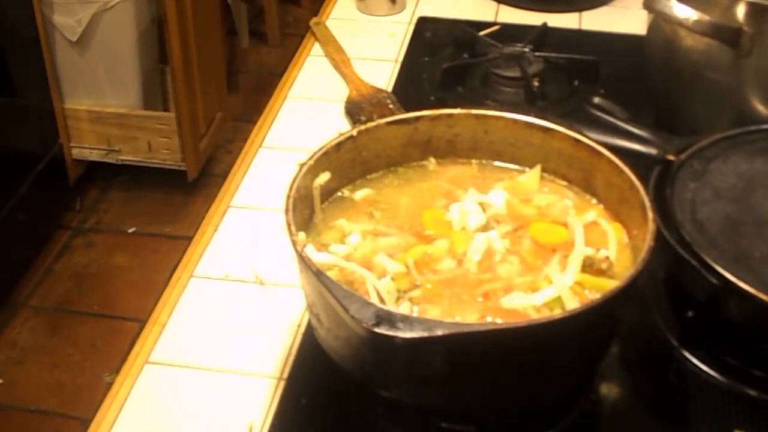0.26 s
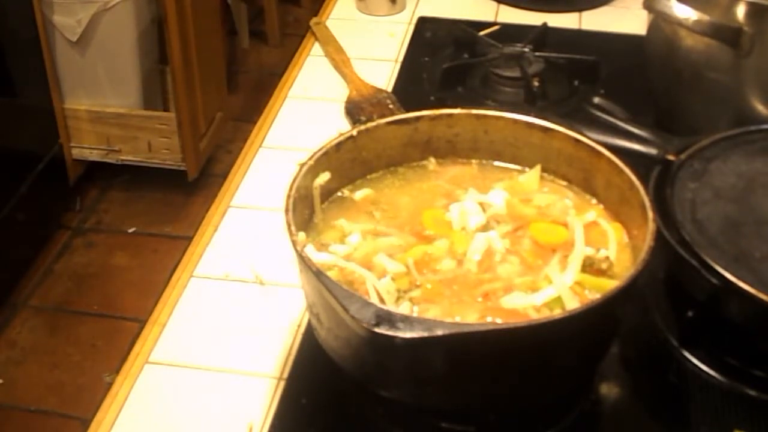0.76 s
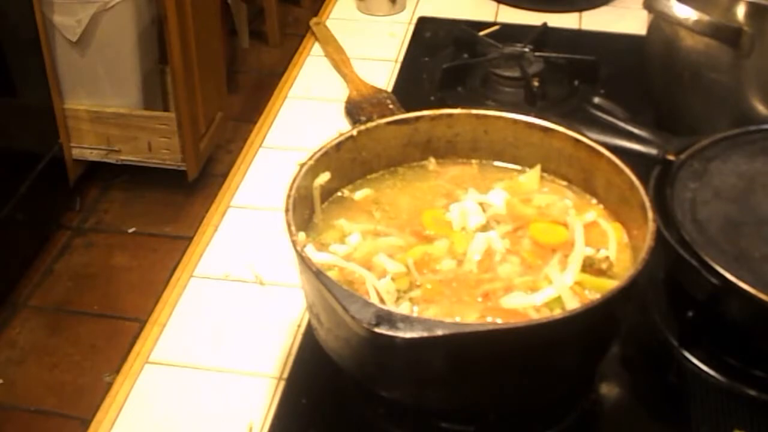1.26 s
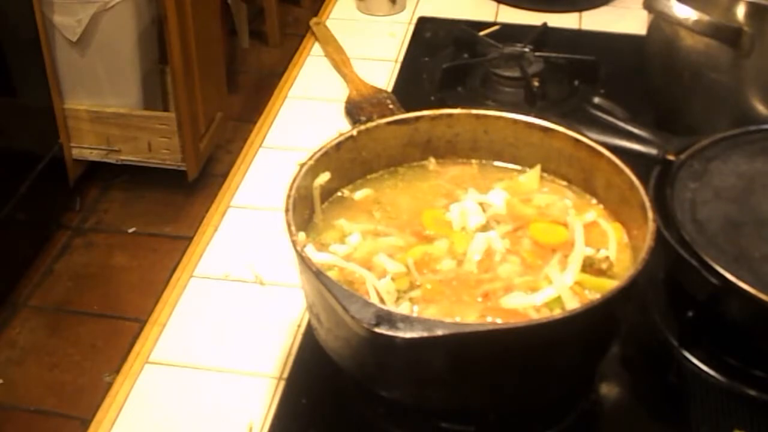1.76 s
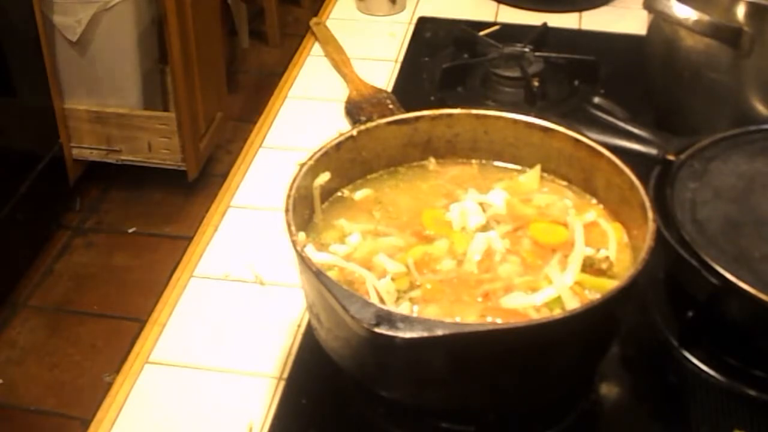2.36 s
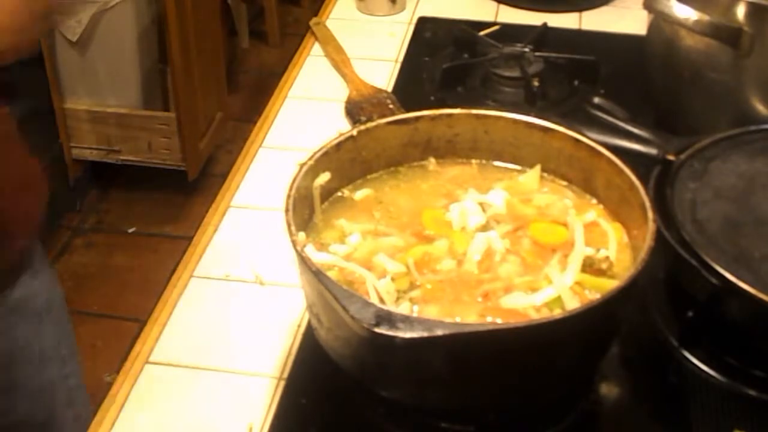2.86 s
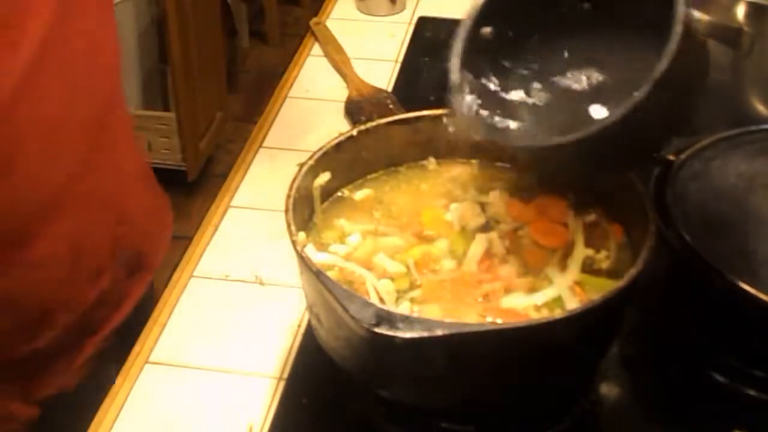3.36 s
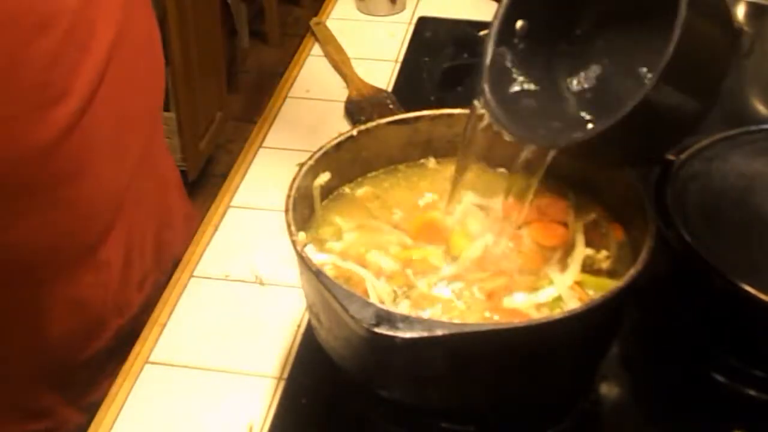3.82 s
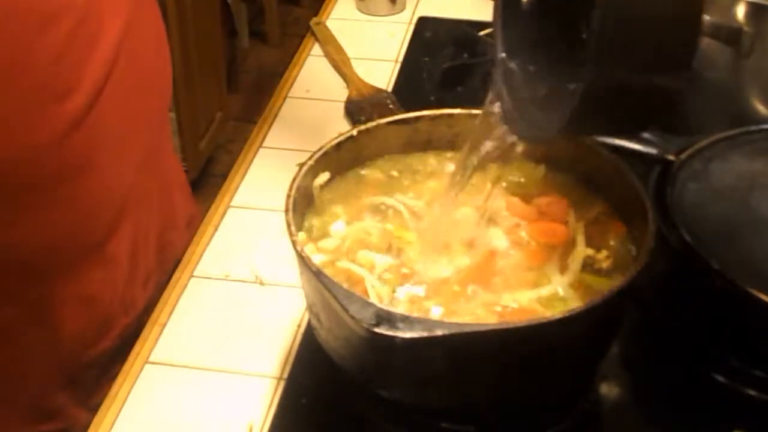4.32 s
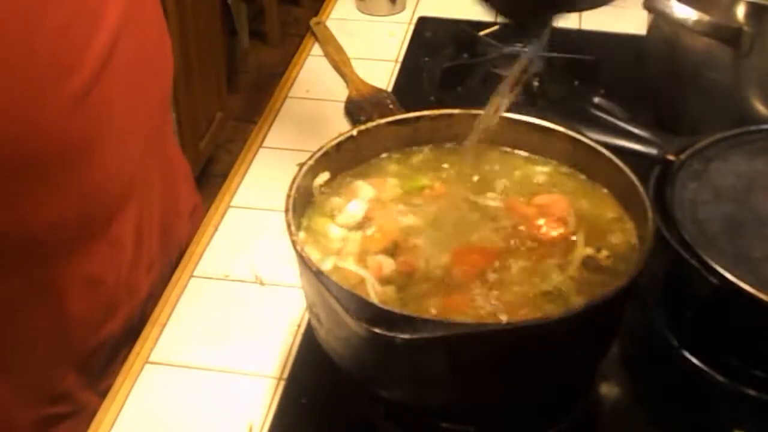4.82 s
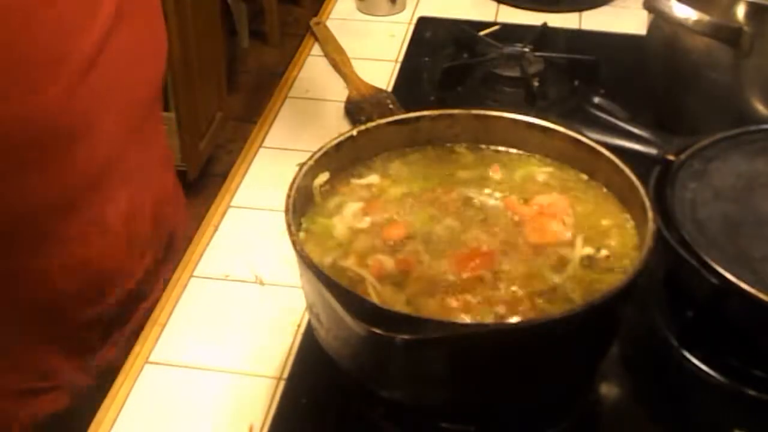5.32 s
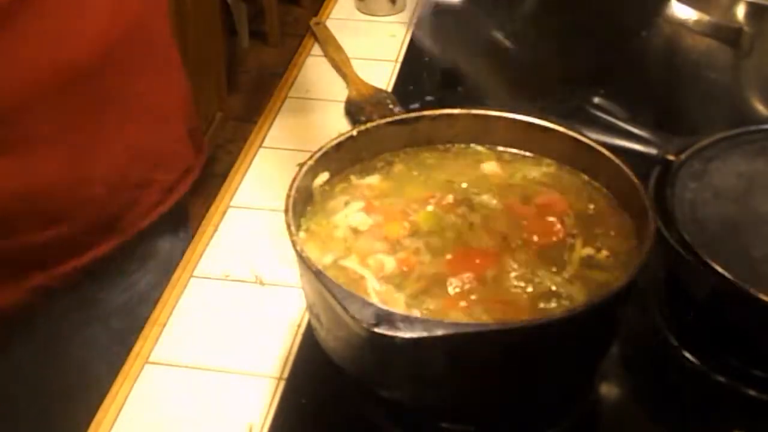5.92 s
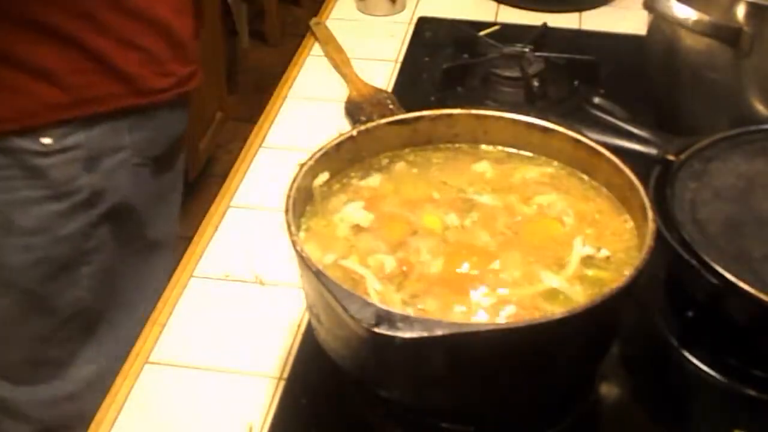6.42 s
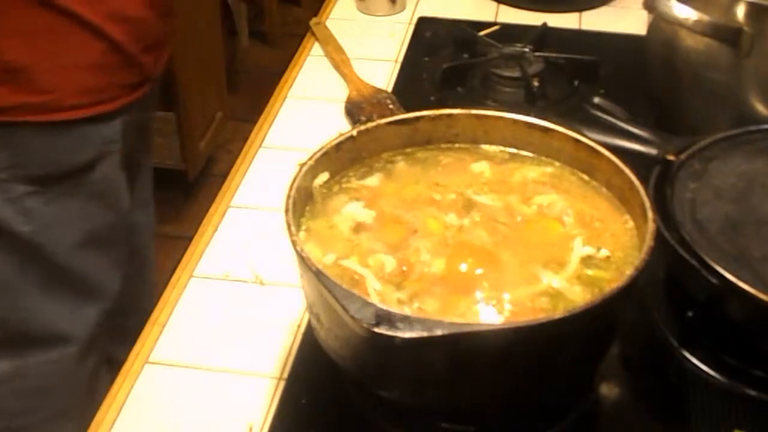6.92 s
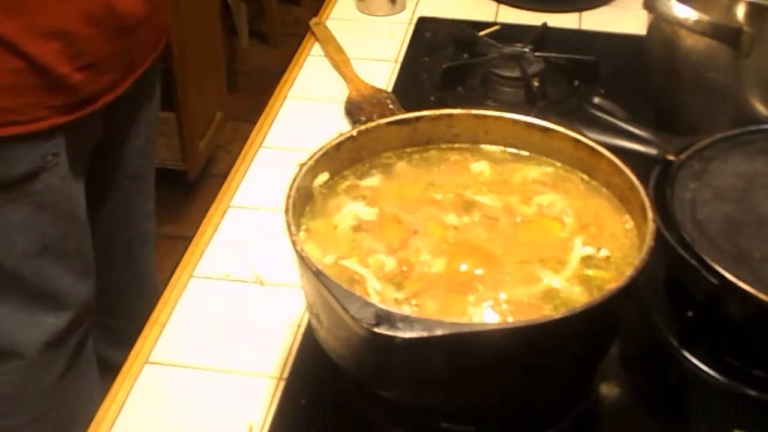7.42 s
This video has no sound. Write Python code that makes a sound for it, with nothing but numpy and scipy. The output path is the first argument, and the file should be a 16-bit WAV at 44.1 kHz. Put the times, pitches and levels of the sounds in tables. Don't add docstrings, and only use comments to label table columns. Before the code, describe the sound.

A kitchen tap hisses into a pan and shuts off, steps shuffle near, water splashes into a soup pot, then metal clanks in a sink.

```python
import sys
import numpy as np
from scipy import signal
from scipy.io import wavfile
from scipy.ndimage import uniform_filter1d

SR = 44100
rng = np.random.default_rng(int(sys.argv[2]) if len(sys.argv) > 2 else 0)


def decibels_to_gain(level_db):
    exponent = np.asarray(level_db, float) / 20
    return 10 ** exponent


def wrap_up_sound(samples):
    columns = np.atleast_2d(samples).T
    tamed = np.clip(columns, -1, 1)
    steps = np.round(tamed * 32767).astype(np.int16)
    wavfile.write(sys.argv[1], SR, steps)


N = 338688
T = np.arange(N) / SR
# f/Hz, likeness/0-1
LIKENESS = [(60, 1), (180, 1), (550, 0.96), (1650, 0.75), (3500, 0), (15000, 0)]


def evened(x):
    return x / np.sqrt(np.mean(x ** 2) + 1e-20)


def read(points, hz):
    f, value = np.transpose(points)
    return np.interp(np.log(hz + 1), np.log(f + 1), value)


def bumps(peaks, hz):
    return sum(db / (1 + (2 * (hz - f) / width) ** 2) for f, width, db in peaks)


def lean_left(db):
    return decibels_to_gain(np.array([[db], [-db]]))


def add(mix, s, sound):
    part = mix[round(s * SR):][:len(sound)]
    part += sound[:len(part)]


def swell(s, db, rise_s, fall_s):
    rising = (s - T) / max(rise_s, 1e-3)
    falling = (T - s) / max(fall_s, 1e-3)
    return decibels_to_gain(db - 20 * np.maximum(rising, falling))


def swells(rows):
    return sum(swell(*row) for row in rows)


def noise(colour, peaks=(), lag=0, patchy_db=1.5, flicker_db=2.0, size=1024, alike=1):
    frames, hz = 4 * N // size + 5, np.fft.rfftfreq(size, 1 / SR)
    a, b, c, d, patches = rng.standard_normal((frames, len(hz), 5)).T
    patches = uniform_filter1d(patches, size=size // 80, axis=0)
    patches = evened(uniform_filter1d(patches, size=8, axis=1))
    same = np.clip(alike * read(LIKENESS, hz), 0, 1)[:, None]
    right = a + 1j * b
    delay = np.exp(-2j * np.pi * hz * lag / SR)[:, None]
    left = same * right * delay + np.sqrt(1 - same ** 2) * (c + 1j * d)
    spectrum_db = (read(colour, hz) + bumps(peaks, hz))[:, None]
    flicker = flicker_db * rng.standard_normal(frames)
    z = np.array([left, right]) * decibels_to_gain(spectrum_db + patchy_db * patches + flicker)
    return evened(signal.istft(z, nperseg=size, noverlap=3 * size // 4)[1][:, :N])


def bubble(hz, t60, rise=0.22, onset_cycles=0.81):
    t = np.arange(int(t60 * SR) + 50) / SR
    ring = np.sin(2 * np.pi * hz * t * (1 + rise * t / t60))
    return ring * decibels_to_gain(-60 * t / t60) * np.minimum(t * hz / onset_cycles, 1)


def swarm(lo_hz, hi_hz, cycles, per_s, spread_db):
    out = np.zeros(N)
    for hz in np.geomspace(lo_hz, hi_hz, num=36):
        level = decibels_to_gain(spread_db * np.minimum(rng.exponential(1, N), 4))
        births = level * (rng.random(N) < per_s / 36 / SR)
        out += signal.oaconvolve(births, np.sqrt(hz) * bubble(hz, cycles / hz))[:N]
    return evened(out)


def strike(blows, modes, split=0.0099, dulling=0.084, spot_db=5.0):
    out, t = np.zeros(N), np.arange(SR // 2) / SR
    shape = (len(modes), 5, 1)
    detune = 1 + split * rng.standard_normal(shape) * (np.arange(5) > 0)[:, None]
    for s, db in blows:
        spots = spot_db * rng.standard_normal(shape)
        slope_db = dulling * min(db - blows[0][1], 0)
        ring = 0
        for (hz, level_db, t60), spot, ratio in zip(modes, spots, detune):
            decay = decibels_to_gain(level_db + slope_db * np.log2(1 + hz / 1000) - 60 * t / t60)
            ring = ring + decay * (decibels_to_gain(spot) * np.sin(2 * np.pi * hz * ratio * t)).sum(0)
        add(out, s, decibels_to_gain(db) * ring * np.minimum(t / 0.0022, 1) / abs(ring).max())
    return out


def kitchen(x, lag, pan_db, wet_db):
    # f/Hz, t60/s
    decay_times = [(200, 0.3), (1000, 0.18), (4000, 0.23), (12000, 0.24)]
    taps = np.zeros((2, SR // 2))
    at = np.arange(100, SR // 2 - 20, 20) + rng.integers(0, 20, (2, (SR // 2 - 101) // 20))
    np.put_along_axis(taps, at, rng.choice([-1., 1.], at.shape), 1)
    hz, t, z = signal.stft(taps, SR, nperseg=256)
    same = np.clip(read(LIKENESS, hz), 0, 1)[:, None]
    z[0] = same * z[1] + np.sqrt(1 - same ** 2) * z[0]
    z = z * decibels_to_gain(-60 * t / read(decay_times, hz)[:, None])
    tail = signal.istft(z, SR, nperseg=256)[1]
    wet = signal.fftconvolve(x[None], tail / np.linalg.norm(tail[0]), axes=1)[:, :N]
    direct = np.array([np.roll(x, round(lag)), x])
    return (direct + decibels_to_gain(wet_db) * wet) * lean_left(pan_db / 2)


def stream():
    # t/s of the peak, spray level/dB, plunge level/dB, rise/s, fall/s
    gushes = [(3.571, -37, -4, 0.016, 0.0082), (3.61, -48, 2.5, 0.02, 0.19), (3.82, -48.5, -16, 0.03, 0.26),
              (4.0, -49, -16.5, 0.57, 0.3), (4.2, -61, 1, 0.58, 0.048), (4.427, -42.5, -4, 0.28, 0.16),
              (4.7, -46, -22, 0.15, 0.069), (4.92, -51.5, 0.5, 0.38, 0.19), (5.07, -37.5, -17, 0.16, 0.027),
              (5.3, -53, -28, 0.87, 0.98), (5.64, -46, -54, 0.89, 0.071)]
    # level against the spray in dB, share of the plunge
    sizes = [(-0.5, 1), (3, 0.67), (-2.5, 0.28), (-2, 0.018)]
    swarms = [swarm(548, 1596, cycles=20.0, per_s=700, spread_db=5.5),
              swarm(1770, 4270, cycles=39.0, per_s=1500, spread_db=6.5),
              swarm(4340, 9300, cycles=47.0, per_s=4000, spread_db=9.0),
              swarm(9800, 18200, cycles=13.0, per_s=10000, spread_db=15.5)]
    water = np.zeros(N)
    for (size_db, share), bubbles in zip(sizes, swarms):
        for s, db, plunge_db, rise_s, fall_s in gushes:
            water += swell(s, db + size_db + share * plunge_db, rise_s, fall_s) * bubbles
    return water


def drops():
    # t/s, peak level/dB, bubble f/Hz
    splashes = [(3.8004, -29, 4270), (3.8432, -20.5, 5750), (3.8717, -26.5, 3680), (3.8986, -19, 6120),
                (3.9321, -21.5, 5040), (3.979, -33, 2870), (3.979, -20, 5600), (4.0214, -20, 3880),
                (4.12, -21.5, 6040), (4.163, -27.5, 2500), (4.182, -28, 2620), (4.205, -39, 2430),
                (4.228, -29, 2480), (4.2544, -30, 2750), (4.3088, -22, 2025), (4.4011, -32, 2340),
                (4.4436, -20.5, 5600), (4.5582, -27.5, 2250), (4.5977, -23, 4050), (4.6658, -25, 2380),
                (4.6942, -24.5, 2340), (4.7168, -26, 3530), (4.7533, -30, 2400), (4.876, -25, 2170),
                (4.9104, -25, 3620), (4.968, -28, 2800), (5.0017, -28, 2090), (5.02, -22, 6390),
                (5.0446, -18, 3720), (5.0535, -16.5, 4060)]
    # t/s, peak level/dB, bubble f/Hz
    spray = [(3.572, -38, 8700), (3.578, -16, 4900), (3.586, -23, 8700), (3.675, -24, 5400),
             (3.755, -25, 8950), (3.79, -30, 3960), (3.815, -25, 2650), (3.835, -32, 3080),
             (3.912, -26, 6460), (3.9325, -22.5, 2960), (3.972, -27, 5950), (3.985, -23, 4100),
             (3.988, -20, 7900), (3.998, -27, 2520), (4.015, -19, 6140), (4.026, -29, 8700),
             (4.105, -24, 9200), (4.15, -25, 6900), (4.168, -26, 8700), (4.178, -23, 8000),
             (4.33, -23.5, 4830), (4.372, -24, 7050), (4.385, -29, 2210), (4.4015, -35, 3160),
             (4.452, -24, 8500), (4.735, -29, 7000), (4.74, -24, 5300), (4.768, -29, 2500),
             (4.79, -24, 8000), (4.8415, -36, 2700), (4.853, -38, 4800), (4.859, -27, 2500),
             (4.889, -26, 3600), (4.94, -23, 4440), (4.95, -23, 5200), (5.035, -29, 3740),
             (5.046, -17, 4900), (5.064, -21, 5200), (5.072, -41, 2560), (5.078, -24, 4700)]
    # t/s, peak level/dB, bubble f/Hz
    glugs = [(3.805, -33, 1170), (3.957, -28, 1060), (3.994, -30, 1090), (4.051, -28, 1070),
             (4.229, -38, 1220), (4.278, -26, 1360), (4.367, -23, 1040), (4.39, -16.5, 910),
             (4.791, -24, 1250), (4.851, -25, 855), (4.921, -30.5, 467), (4.965, -26.5, 537),
             (5.006, -28.5, 440), (5.052, -27, 1035), (4.405, -21, 640), (4.42, -21, 870), (4.45, -27, 613),
             (3.566, -36, 1130), (3.577, -39, 1860)]
    # t/s, peak level/dB, bubble f/Hz
    slops = [
        (2.8365, -40, 1920),
        (2.901, -40, 1465),
        (2.9194, -40, 2260),
        (3.2131, -41, 1165),
    ]
    # t/s, peak level/dB, bubble f/Hz
    drips = [
        (5.1976, -31, 1600),
        (5.2328, -31.5, 3380),
        (5.4003, -36, 5900),
        (5.515, -33.5, 4000),
        (5.5589, -29, 6900),
        (5.6087, -24.5, 4600),
        (5.76, -33, 7100),
    ]
    # t/s, peak
    # level/dB, centre f/Hz
    droplets = [(3.6371, -29, 6570), (3.678, -14.5, 9440), (3.7614, -22, 13400), (3.783, -36, 7910),
                (3.7997, -19, 7250), (3.8718, -13.5, 8260), (3.897, -34, 6140), (3.9789, -19.5, 9200),
                (4.0816, -32, 14300), (4.1041, -38, 6020), (4.446, -18, 6800), (4.6357, -25, 10500),
                (4.6518, -22, 10900), (4.773, -20.5, 10300), (4.8354, -21, 11300), (4.875, -23, 7400),
                (4.9167, -18.5, 10700), (5.0186, -20.5, 6500), (5.0389, -24, 14100), (5.0533, -10, 14200),
                (5.104, -24, 6300), (5.1298, -23, 6200), (5.1522, -32, 15200), (5.2326, -13.5, 13500),
               (5.2814, -33, 15300), (5.3069, -39, 15500), (5.3325, -25, 13800), (5.368, -22.5, 8400),
               (5.4348, -24, 13100), (5.456, -21, 8250), (5.5042, -17, 13000), (5.5526, -20, 12600),
               (5.6296, -32, 13500), (5.6411, -25, 15100), (5.7606, -39, 8200),
                (2.4413, -42, 15000), (2.91, -33, 8060), (3.0788, -29, 13600), (3.4929, -31, 13400),
             (5.7877, -30, 15100), (5.8142, -30, 13500), (5.87, -31, 13500), (5.9464, -32, 15100),
             (5.9793, -38, 15400), (6.0566, -25, 13000), (6.103, -38, 15300), (6.232, -30, 15200),
             (6.2833, -24, 14200), (6.8518, -30, 13400)]
    # t/s, peak level/dB, centre f/Hz
    ticks = [(3.8718, -20, 4000), (3.9325, -25, 3500), (4.0148, -27, 6000), (4.15, -27, 6000),
             (4.4015, -30, 3000), (4.79, -35, 2500), (3.801, -30, 6960), (3.988, -29, 8000),
             (4.309, -32, 2500), (4.442, -23, 8500), (4.4535, -26, 8000), (4.598, -30, 7000),
             (4.666, -28, 3000), (4.712, -37, 6000), (4.735, -33, 7000), (4.877, -27, 6000),
             (5.0205, -29, 7000), (5.052, -20, 5000), (5.105, -29, 7500), (4.853, -30, 2000),
             (5.0715, -31, 3000), (5.1976, -29.5, 3000), (5.2328, -27, 5030)]
    kinds = [(splashes, 62., -4.5, -7), (spray, 36., -4, -5.5), (glugs, 24., -5, -11),
             (slops, 70., -5, -12), (drips, 70., -11, 2.1),
             (droplets, 34., -3.5, -1.5)]
    water = np.zeros(N)
    for rows, cycles, ring_db, click_db in kinds:
        for s, db, hz in rows:
            add(water, s, decibels_to_gain(db + ring_db) * bubble(hz, cycles / hz, rise=0.088, onset_cycles=4.14))
            add(water, s, decibels_to_gain(db + click_db) * bubble(1.116 * hz, 12.5 / hz, onset_cycles=0.67))
    for s, db, hz in ticks:
        add(water, s, decibels_to_gain(db + 7.0) * bubble(hz, 4.2 / hz, onset_cycles=0.35))
    return water


def first_slap():
    # t/s, peak level/dB
    slaps = [
        (3.5897, -3),
        (3.637, -17),
    ]
    # f/Hz, level/dB, t60/s
    pot_modes = [(116.4, -25.5, 0.77), (314, -19, 0.37), (530, -22, 0.065), (715, 2.5, 0.1),
                 (910, 10.5, 0.023), (1030, 8, 0.023), (1210, -31, .08), (1460, -8, 0.024),
                 (1495, -6, 0.05), (1900, -9, 0.034), (2060, -6, 0.051), (2500, -13, 0.036),
                 (3100, -2, 0.049), (5470, 0, 0.025)]
    sound = strike(slaps, pot_modes, split=0.041)
    s, db = slaps[0]
    add(sound, s, decibels_to_gain(db + 6) * bubble(1220, 0.0056, onset_cycles=0.81))
    return sound


def pour():
    no_bass = signal.butter(2, 350, "highpass", fs=SR, output="sos")
    water = signal.sosfilt(no_bass, stream() + drops())
    return kitchen(water + first_slap(), lag=0, pan_db=-1.4, wet_db=-1.0)


def clanks():
    # t/s, peak level/dB
    landings = [
        (7.1745, 4.5),
        (7.186, -12.5),
        (7.203, -12),
        (7.2165, -5.5),
        (7.223, -6.5),
        (7.262, -12.5),
        (7.272, -20),
        (7.322, -14.5),
        (7.335, -38),
        (7.352, -20.5),
    ]
    # f/Hz, level/dB, t60/s
    pan_modes = [(438, -9, 0.17), (542, -10, 0.078), (612, -12, 0.14), (673, -6.5, 0.75), (744, -9.5, 0.6),
                 (804.6, -1.5, 0.21), (856, 1.5, 0.24), (224, -15, 0.1), (949, 8.5, 0.069),
                 (1019, -8.5, 0.57), (1440, -12, 0.12), (1543, -14, .14), (2250, -9, 0.11),
                 (2880, -12, 0.14)]
    # t/s, peak level/dB
    rim_blows = [
        (7.45, -14.5),
        (7.462, -14),
        (7.474, -18),
        (7.492, -25),
        (7.513, -18),
        (7.526, -16),
        (7.548, -36),
    ]
    # f/Hz, level/dB, t60/s
    steel_modes = [(332, -2.5, 0.1), (442, -1, 0.14), (643, 5.5, 0.15), (870, -2, 0.16), (1025, -0.5, 0.16),
                   (1960, -18, 0.1), (2320, -2.5, 0.092), (2730, 8, 0.06), (3440, 2, 0.1), (4280, -9, .07),
                   (4500, -9, 0.065), (5500, -10, 0.074), (6080, -9, .07), (6580, -4, 0.065)]
    # t/s, peak level/dB
    brushes = [
        (6.773, -41),
        (6.788, -33),
        (6.8, -34),
        (6.82, -34),
        (6.84, -34),
        (6.862, -37),
    ]
    # f/Hz, level/dB, t60/s
    edge_modes = [(1230, 2, 0.069), (1600, -6, .06), (1900, -1, .06), (2250, 2, 0.066), (2730, -5, .06),
                  (3280, 6, 0.093), (3420, -10, .07)]
    # t/s, peak level/dB
    chimes = [
        (7.323, -33),
        (7.615, -40),
    ]
    # f/Hz, level/dB, t60/s
    chime_mode = [(1165, 0, 0.37)]
    metal = strike(landings, pan_modes)
    metal += strike(rim_blows, steel_modes, split=0.017, dulling=0.36, spot_db=6.5)
    metal += strike(brushes, edge_modes, split=0.038)
    metal += strike(chimes, chime_mode, split=0.00073)
    return kitchen(metal, lag=-4.5, pan_db=0.5, wet_db=-2.5)


def rattle():
    # t/s, dull rattle level/dB, bright rattle level/dB, basin boom level/dB
    bursts = [
        (7.173, -25.5, -34, -19.5),
        (7.321, -82, -77, -45),
        (7.449, -29.5, -22, -24.5),
    ]
    dull = noise([(300, -26), (1500, -1.0), (4000, -9.0), (15000, -26.0)],
                 lag=-0.75, size=256, flicker_db=-0.5)
    bright = noise([(1500, -12), (5500, 8.5), (9000, 6.0), (15000, -10)],
                   [(3270, 160, 14.7), (5300, 190, 2.7), (6250, 410, 5.2)],
                   lag=-19, size=256, flicker_db=0.0)
    boom = noise([(170, -37), (210, -10.5), (420, 8.5), (680, 9.0), (1000, 2.5), (1300, -8), (3000, -56)],
                 lag=0.55, patchy_db=2.5, size=512)
    # hold in s and fall in dB/s after a blow, level in dB the slide reaches
    parts = [(dull, 0.039, 183, -28), (bright, 0.025, 279, -27.5), (decibels_to_gain(-4.0) * boom, 0.06, 177, -25)]
    slide_s, slide_rise_db_per_s = 7.68, 360
    sound = 0
    for k, (part, hold_s, fall_db_per_s, slide_db) in enumerate(parts):
        level = decibels_to_gain(slide_db - slide_rise_db_per_s * (slide_s - T))
        for s, *db in bursts:
            level = level + (T > s) * decibels_to_gain(db[k] - fall_db_per_s * np.maximum(T - s - hold_s, 0))
        sound = sound + level * part
    return sound * lean_left(.6)


def closing(s):
    return -105 * (np.maximum(T - s, 0) / .4) ** 2.15


def tap():
    # f/Hz, level/dB
    jet_colour = [(59, -28), (180, -28), (330, -13), (1130, -11), (3250, -6), (9210, 1), (14700, -1),
                  (16000, -22)]
    # f/Hz, width/Hz, level/dB
    wall_peaks = [(953, 24, 10.5), (820, 260, 3.5), (3680, 420, -2.5), (6900, 190, 1.5), (8630, 500, 3),
                  (9240, 97, 5), (10120, 46, 12), (10250, 32, -8), (15100, 690, 10)]
    shut_s = 1.594
    jet = noise(jet_colour, wall_peaks, lag=-3.0, patchy_db=0.5, flicker_db=0.76)
    low = signal.sosfilt(signal.butter(2, 3000, fs=SR, output="sos"), jet)
    high = jet - low
    jet = decibels_to_gain(-32.5) * (decibels_to_gain(closing(shut_s)) * high + decibels_to_gain(3 + closing(shut_s + 0.071)) * low)
    load = decibels_to_gain(-62.5 + 5.5 * T + closing(shut_s + 0.016))
    load += swell(1.96, -49, 0.14, 0.09)
    basin = load * noise([(100, -81), (400, -59)], [(208.1, 15.8, 50.3)], lag=10, size=4096)
    return (jet + basin) * lean_left(1.4)


def shuffle():
    # f/Hz, level/dB
    step_colour = [(80, -34), (150, -22), (350, -3), (700, -3), (1200, -6.5), (3000, -21)]
    # f/Hz, level/dB
    scuff_colour = [(400, -52), (1000, -16), (1650, -0.5), (2500, -3), (3250, -4.5), (4000, -4.5),
                    (8000, -41)]
    # f/Hz, level/dB
    cloth_colour = [(2000, -11), (4500, 5.5), (7000, 5), (11000, 3.5), (15500, 2.5)]
    # t/s of the peak, level/dB, rise/s, fall/s
    footfalls = [
        (2.0, -66, 0.99, .6),
        (2.302, -61.5, 0.52, 0.5),
        (2.714, -56, 0.37, 0.37),
        (3.216, -56.5, 0.079, 0.15),
        (5.95, -64, 0.99, 0.98),
        (6.162, -60, 0.26, 0.15),
        (6.3, -61, 0.31, 0.85),
        (6.568, -57.5, 0.87, 0.27),
        (6.774, -52, .005, 0.24),
    ]
    # t/s of the peak, level/dB, rise/s, fall/s
    scuffs = [
        (2.2, -65, 1, 0.52),
        (2.6, -59.5, 0.24, 0.49),
        (2.72, -62.5, 0.22, 0.26),
        (3.23, -63, .06, 0.18),
        (5.92, -66, 0.47, 0.43),
        (6.46, -53.5, 0.45, 0.15),
        (6.568, -43.5, 0.17, 0.13),
        (6.792, -45.5, 0.022, 0.28),
    ]
    # t/s of the peak, level/dB, rise/s, fall/s
    rustles = [
        (2.11, -56, 0.037, 0.16),
        (2.26, -53.5, 1, 0.37),
        (2.58, -50, 0.24, 0.49),
        (2.73, -58.5, .4, 0.33),
        (3.322, -56.5, .13, 0.08),
        (3.529, -57, .25, .05),
        (6.05, -56.5, 0.24, 0.21),
        (6.35, -59, 0.51, .4),
        (6.46, -56, 0.17, .08),
        (6.568, -44, 0.24, 0.16),
    ]
    # t/s of the peak, level/dB, rise/s, fall/s
    sleeves = [
        (2.44, -50, .13, 0.19),
        (6.02, -52, 0.11, 0.092),
    ]
    # t/s, peak level/dB, f/Hz
    heels = [
        (2.759, -40.5, 571),
        (6.14, -33.5, 380),
        (6.153, -35, 303),
        (6.216, -41, 630),
    ]
    texture = dict(lag=-0.9, patchy_db=0.5, flicker_db=1.5, size=512)
    sound = swells(footfalls) * noise(step_colour, **texture)
    sound += swells(scuffs) * noise(scuff_colour, [(3380, 280, 5.9)], **texture)
    sound += swells(rustles) * noise(cloth_colour, **texture)
    hiss = noise([(13500, -40), (15000, 8), (16000, -13)], flicker_db=1.0, size=256)
    sound += swells(sleeves) * hiss
    knocks = np.zeros(N)
    for s, db, hz in heels:
        add(knocks, s, decibels_to_gain(db - 2.0) * bubble(hz, 0.019, rise=0, onset_cycles=0.24))
    return (sound + knocks) * lean_left(1.)


def low_thuds():
    # t/s of the peak, level/dB, rise/s, fall/s
    thuds = [
        (5.05, -67, .02, .06),
        (5.9, -61, 0.055, 0.089),
        (6.02, -60, 0.057, 0.13),
        (6.2, -60, 0.066, 0.11),
        (7.18, -52, .004, 0.11),
        (7.68, -45, .03, .1),
    ]
    rumble = noise([(30, -30), (70, -22), (120, 0), (200, -31), (400, -60)], size=2048)
    return swells(thuds) * rumble * lean_left(1.)


def fridge():
    # f/Hz, rms level/dB
    hums = [(355.3, -68), (419.9, -72)]
    return sum(decibels_to_gain(db + 2.5) * np.sin(2 * np.pi * hz * T) for hz, db in hums)


def room_tone():
    # f/Hz, level/dB per Hz
    room_colour = [(40, -40), (103, -19), (364, 0), (569, -6), (1100, -7.5), (4420, -15.5), (12500, -15),
                   (16000, -19)]
    # f/Hz, width/Hz, level/dB
    hiss_band = [(13400, 740, 11)]
    air = noise(room_colour, hiss_band, lag=-4.0, patchy_db=-0.5, flicker_db=0.8, size=2048, alike=0.28)
    return decibels_to_gain(-54) * air * lean_left(.6)


def scene():
    return pour() + clanks() + rattle() + tap() + shuffle() + low_thuds() + fridge() + room_tone()


def band_limit(x):
    return signal.sosfilt(signal.butter(12, 16430, fs=SR, output="sos"), x)


def record(dry):
    bass_cut = signal.butter(6, 170, "highpass", fs=SR, output="sos")
    cut = signal.sosfilt(bass_cut, dry) + decibels_to_gain(-17.5) * dry
    edge = signal.firwin(511, 16050, window=("kaiser", 6), fs=SR)
    finished = np.clip(signal.oaconvolve(cut, edge[None], "same"), -.92, .92)
    return band_limit(finished)


dry = scene()
out = record(dry)
wrap_up_sound(out)
```